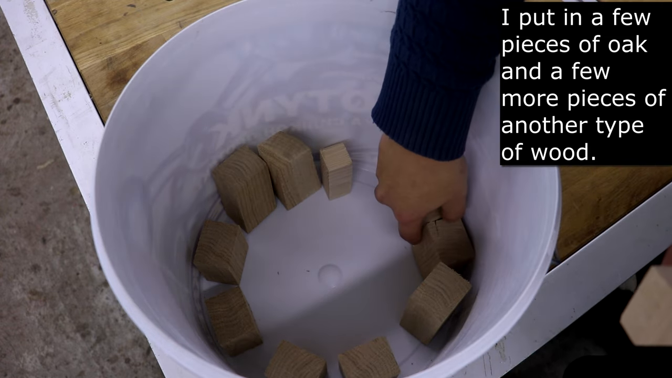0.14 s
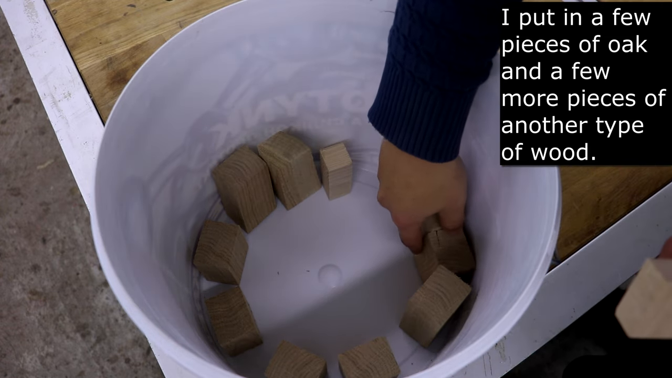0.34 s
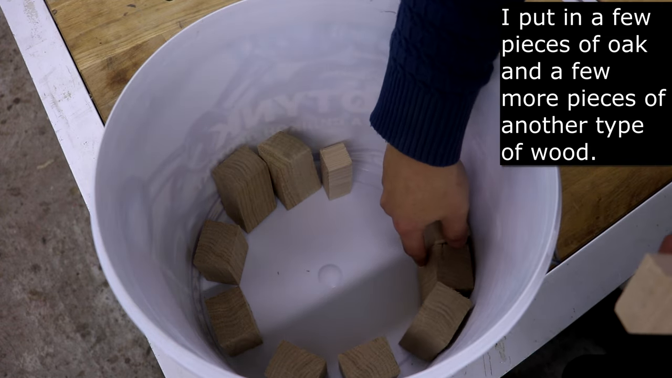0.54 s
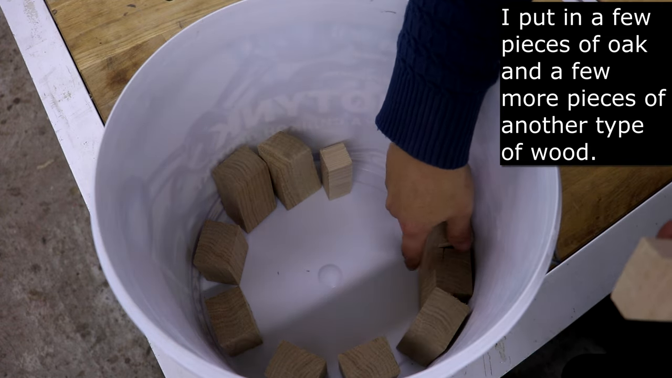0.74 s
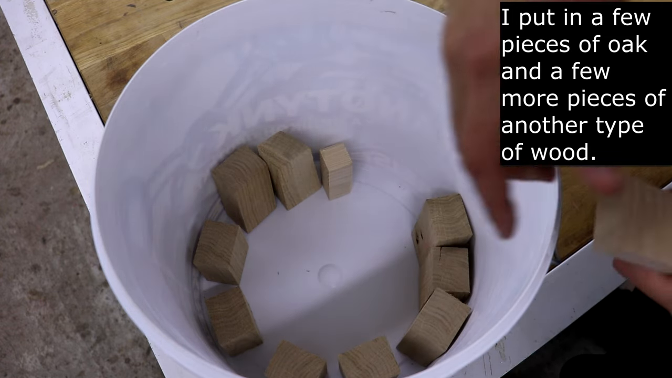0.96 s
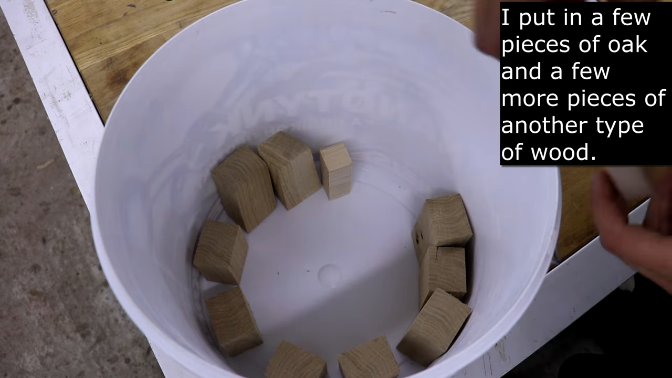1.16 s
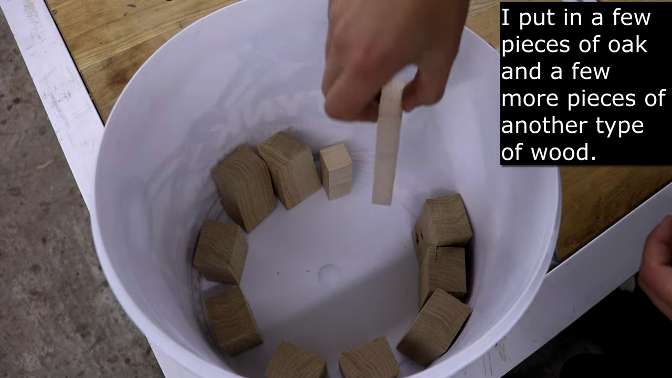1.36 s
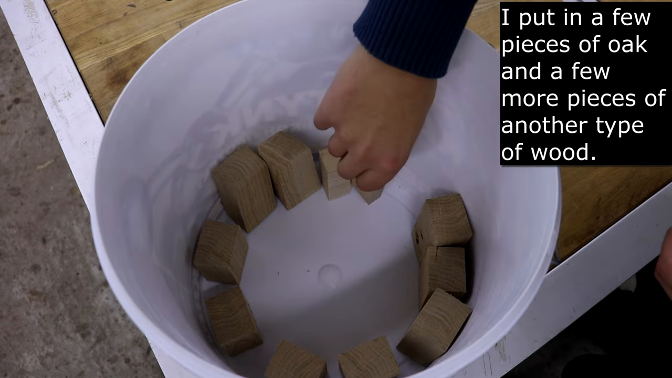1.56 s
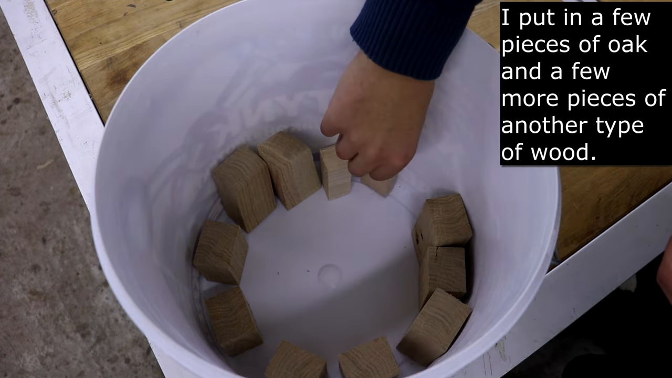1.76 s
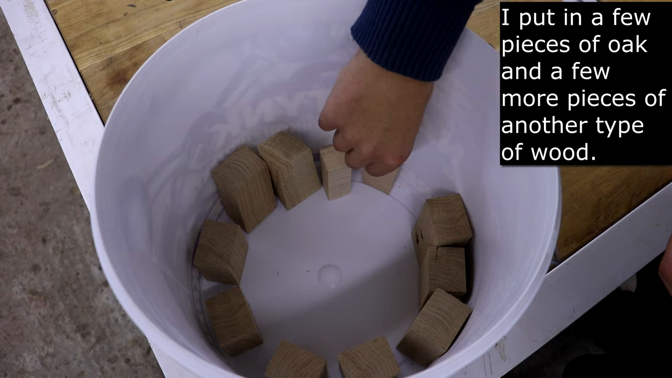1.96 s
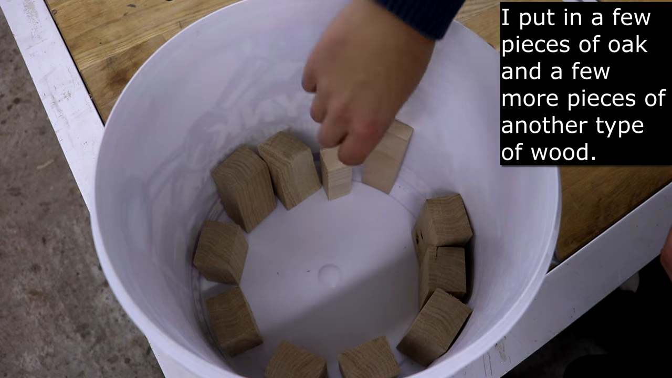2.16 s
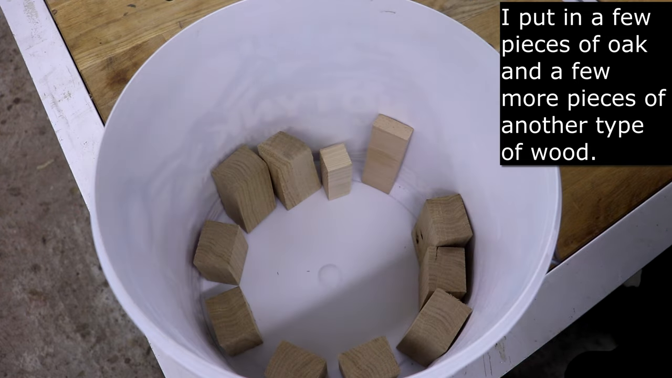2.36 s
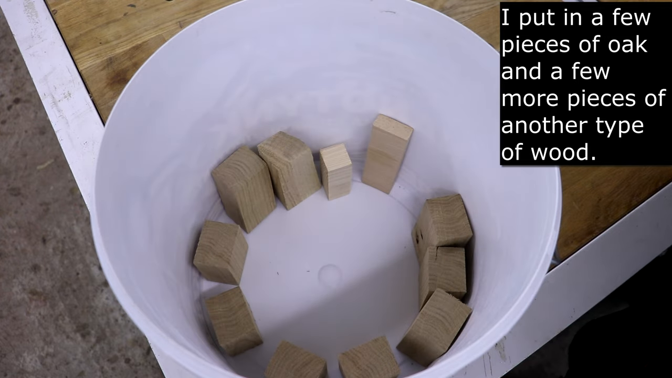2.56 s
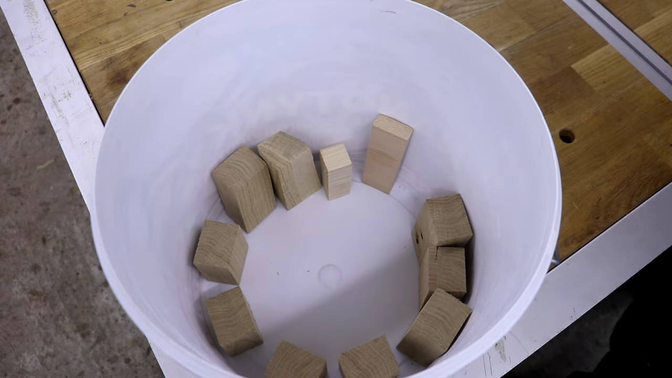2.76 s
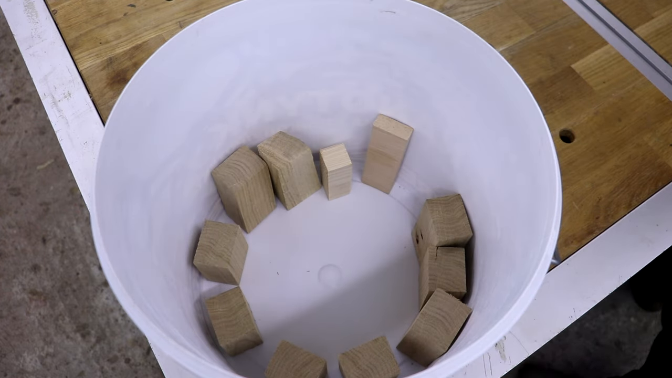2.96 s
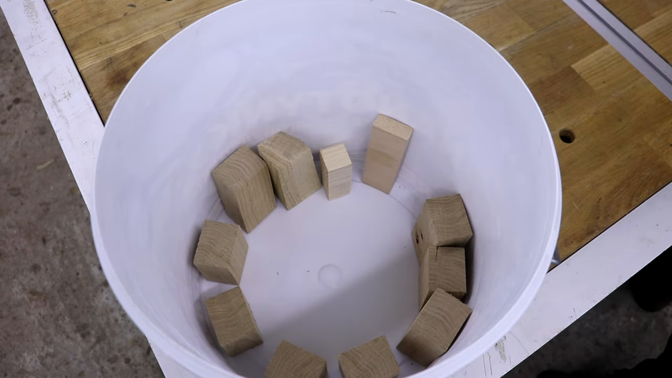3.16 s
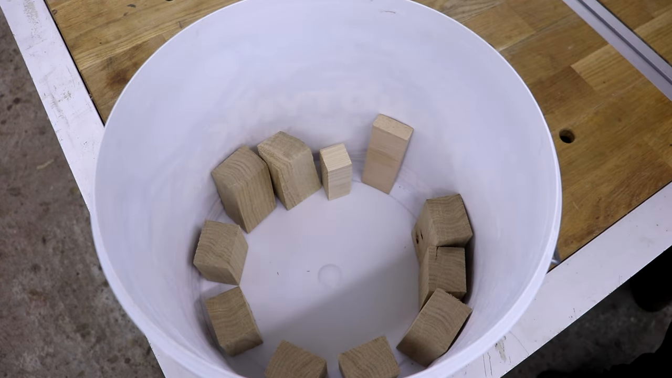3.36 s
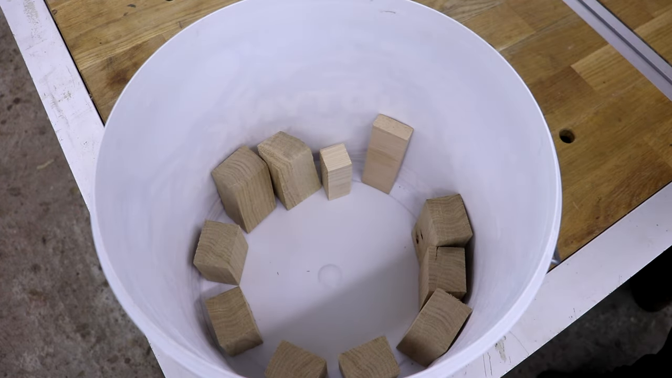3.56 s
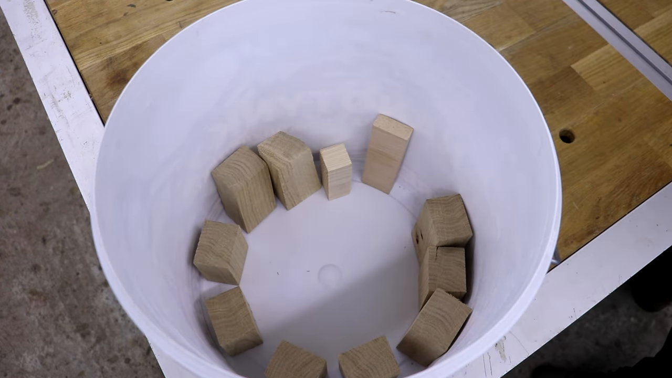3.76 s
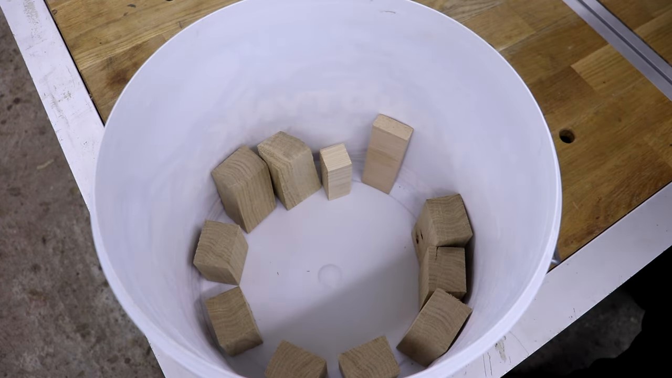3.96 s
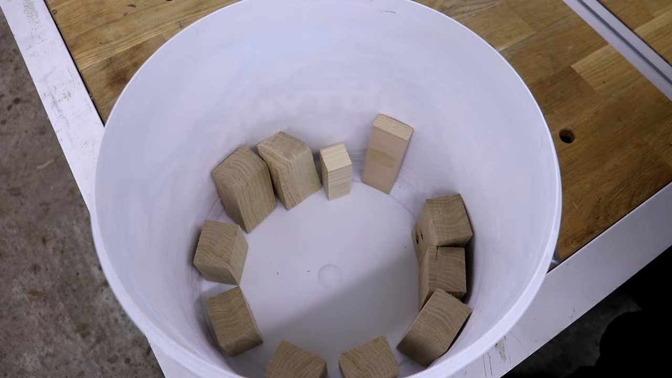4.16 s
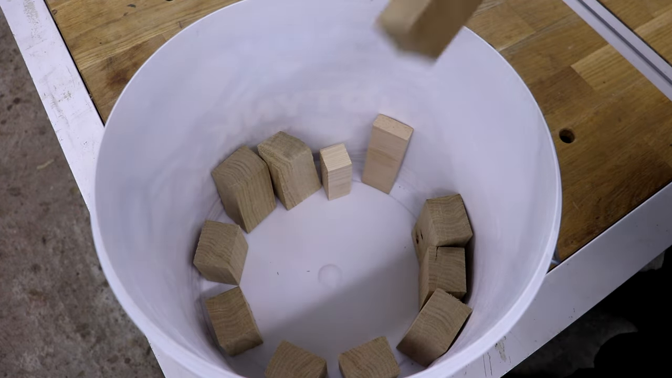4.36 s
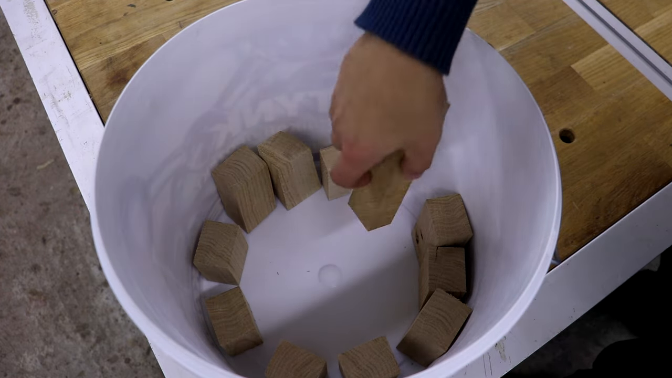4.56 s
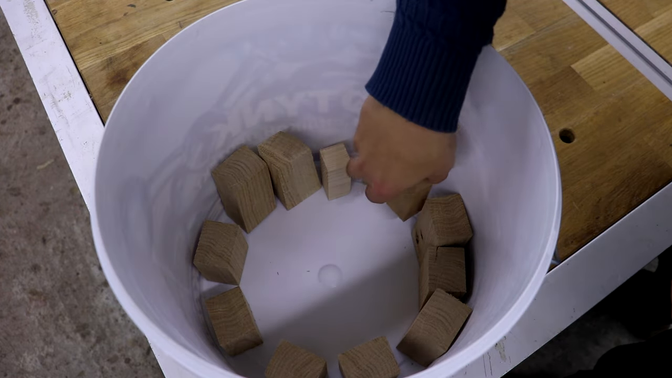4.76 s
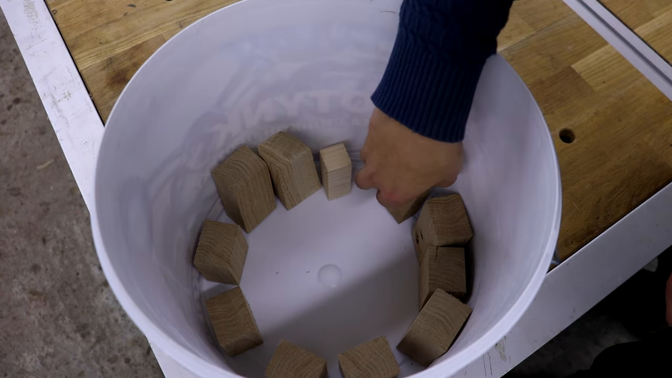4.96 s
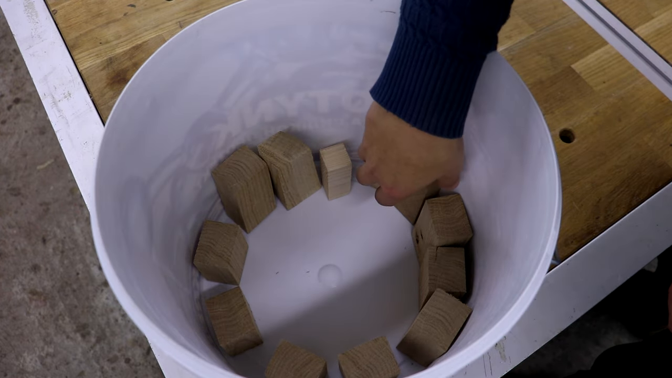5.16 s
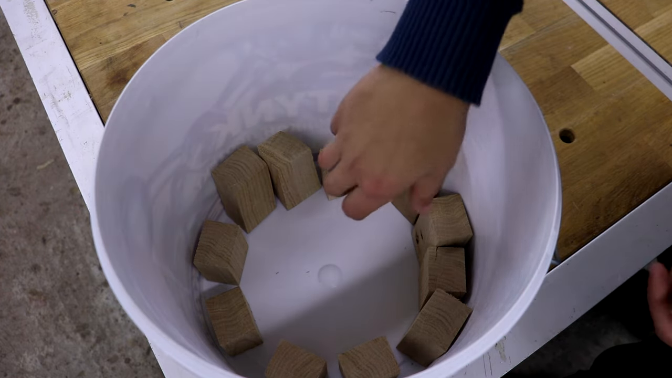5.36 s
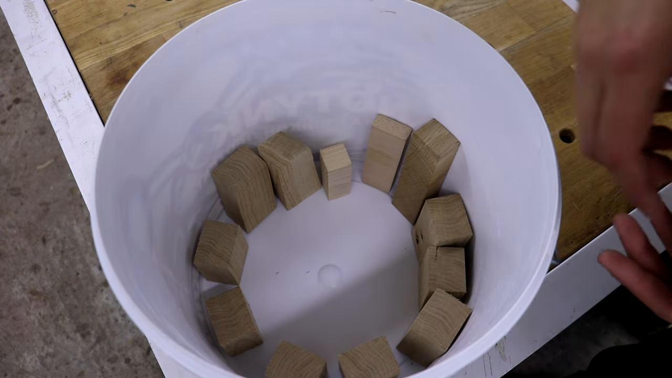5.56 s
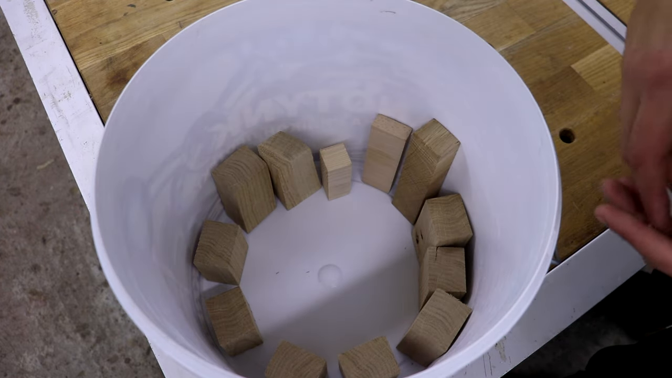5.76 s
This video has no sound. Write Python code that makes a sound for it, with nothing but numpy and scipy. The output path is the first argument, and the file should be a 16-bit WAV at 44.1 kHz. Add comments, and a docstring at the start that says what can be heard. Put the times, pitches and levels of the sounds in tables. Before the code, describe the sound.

Small wooden blocks scrape and clack as they are set into a plastic bucket, with hollow knocks over a faint machine hum.

```python
"""Wooden blocks in a plastic bucket

A hand slides small wooden blocks around a bucket on a workbench and drops two more in.
Each blow cracks in the block, rattles the wall and booms in the base. A sleeve swishes,
a machine hums and dull knocks come from elsewhere in the workshop. The close microphone
overloads on the hardest blows, and its gain control lets the room swell up behind them."""
import sys
import numpy as np
from scipy import signal
from scipy.fft import rfft, irfft, next_fast_len
from scipy.io import wavfile
from scipy.ndimage import uniform_filter1d

SR = 44100
rng = np.random.default_rng(int(sys.argv[2]) if len(sys.argv) > 2 else 0)


def store_pcm(level_fs):
    """Save levels as 16-bit WAV."""
    pcm = np.round(np.clip(level_fs, -1, 1) * 32767).astype(np.int16)
    wavfile.write(sys.argv[1], SR, np.atleast_2d(pcm).T)


N = 256220
T = np.arange(N) / SR
RING_T = T[:SR // 4]  # the quarter second that one blow lasts


def amp(db):
    """Turns decibels into a gain."""
    return 10 ** (np.asarray(db) / 20)


def unit(x):
    """Scales a sound to an average (rms) level of one."""
    return x / np.sqrt(np.mean(x ** 2) + 1e-20)


def curve_at(points, hz):
    """Looks up values between a table's rows, on a log-frequency axis."""
    freqs, values = np.transpose(points)
    return np.interp(np.log(hz + 1), np.log(freqs + 1), values)


def add(mix, start, sound):
    """Mixes a sound in at a start time in seconds."""
    part = mix[max(round(start * SR), 0):][:len(sound)]
    part += sound[:len(part)]


def cut(x, order, hz, kind):
    """Keeps the lows or the highs; a higher order cuts more steeply."""
    return signal.sosfilt(signal.butter(order, hz, kind, fs=SR, output="sos"), x)


def contact(hz, hard_hz):
    """A soft contact lasts longer, so it barely stirs frequencies above hard_hz."""
    return 1 / np.sqrt(1 + (hz / hard_hz) ** 3)


def colour(x, spectrum, hard_hz=np.inf):
    """Shapes a sound's lows and highs, then scales it to a level of one."""
    size = next_fast_len(len(x))
    hz = np.fft.rfftfreq(size, 1 / SR)
    shaped = rfft(x, size) * amp(curve_at(spectrum, hz)) * contact(hz, hard_hz)
    return unit(irfft(shaped, size)[:len(x)])


def mode(hz, t60):
    """One ringing tone that fades by 60 dB in t60 seconds."""
    return amp(-60 * RING_T / t60) * np.sin(2 * np.pi * hz * RING_T)


def dying(t60, rise):
    """A loudness curve that rises quickly and dies away; both times are in seconds."""
    return np.exp(-np.log(1000) * RING_T / t60) * (1 - np.exp(-RING_T / rise))


def resonate(x, hz, width):
    """Makes a sound ring in a band around hz; the width is in Hz too."""
    turn = np.exp(2j * np.pi * np.cumsum(hz * np.ones(len(x))) / SR)
    decay = np.exp(-np.pi * width / SR)
    return unit((turn * signal.lfilter([1 - decay], [1, -decay], x / turn)).real)


def slips(per_s, spread_db):
    """Many tiny clicks of uneven size, like the slips of friction."""
    size = amp(spread_db * np.minimum(rng.exponential(1, N), 4))
    return rng.standard_normal(N) * size * (rng.random(N) < per_s / SR)


def stroke(start, rise, fall):
    """The loudness of one hand movement: it speeds up smoothly, then slows to rest."""
    ramp = np.interp(T, [start, start + rise, start + rise + fall], [0, 1, 0])
    return np.sin(np.pi / 2 * ramp) ** 1.84  # a higher power gives a sharper peak


def background():
    """Faint hiss and a slightly wavering machine hum."""
    # Each row: a machine tone's pitch in Hz, level in dB.
    hum_tones = [(73.3, -63.5), (367, -90.5), (585, -77.5), (1318, -80.5)]
    # Each row: frequency in Hz, the hiss's relative level in dB.
    air_spectrum = [(20, -8.5), (60, 4.5), (200, 3), (550, 3), (700, -3), (1400, -3.5), (2100, -7),
                    (5000, -10), (9000, -13.5), (15500, -15.5)]
    waver = unit(uniform_filter1d(rng.standard_normal(N), SR // 4))
    wavering_t = T + 0.004 * np.cumsum(waver) / SR
    hum = sum(amp(db) * np.sqrt(2) * np.sin(2 * np.pi * hz * wavering_t) for hz, db in hum_tones)
    return hum + amp(-63) * colour(rng.standard_normal(N), air_spectrum)


def room(x, build_up):
    """The workshop's many scattered echoes, each frequency dying at its own speed."""
    # Each row: frequency in Hz, seconds for the echoes to fade by 60 dB.
    fade_times = [(100, 0.45), (350, 0.29), (1200, 0.57), (3000, 0.54), (6000, 0.41), (10000, 0.27),
                  (16000, 0.16)]
    # Each row: frequency in Hz, the echoes' relative level in dB.
    echo_spectrum = [(60, -15.5), (200, 5.5), (400, 4), (700, 8.5), (1500, -5), (4000, -7), (8000, -2),
                     (16000, -9.5)]
    echoes = rng.choice([-1., 1.], SR) * (rng.random(SR) < 4000 / SR)
    hz, t, bands = signal.stft(echoes, SR, nperseg=256)
    bands *= np.exp(-np.log(1000) * t / curve_at(fade_times, hz)[:, None])
    bands *= amp(curve_at(echo_spectrum, hz))[:, None]
    tail = signal.istft(bands, SR, nperseg=256)[1][:SR] * (1 - np.exp(-T[:SR] / build_up))
    return signal.oaconvolve(x, tail / np.linalg.norm(tail))[:N]


def knocks():
    """Muffled blows on something heavy: a thud, a hollow tok and two low tones, with no deep bass."""
    # Each row: start in seconds, level in dB, hardness (where the treble is cut) in Hz, boom in dB.
    far_hits = [(2.741, -49, 1030, -52), (3.095, -42, 1366, -52.5), (3.168, -44.5, 1520, -64),
                (3.686, -42, 1880, -32.5), (3.698, -34, 2180, -33.5), (3.715, -32.5, 2380, -37),
                (3.727, -59, 1660, -34), (4.1114, -41.5, 1460, -56), (4.152, -51, 1510, -47.5)]
    # Each row: frequency in Hz, the thud's relative level in dB.
    thud_spectrum = [(40, -29.5), (105, -44), (170, -17), (380, 8.5), (600, 1.5), (800, -0.5), (1350, 9.5),
                     (2100, 2.5), (3000, 4), (5000, 3), (14000, -10)]
    out = np.zeros(N)
    boom = mode(hz=180.6, t60=0.11) + amp(-8.5) * mode(hz=375, t60=0.14)
    boom *= 1 - np.exp(-RING_T / 0.002)
    tok = mode(hz=1065, t60=0.011)
    for start, db, hard_hz, boom_db in far_hits:
        thud = colour(rng.standard_normal(len(RING_T)), thud_spectrum) * dying(t60=0.081, rise=0.00069)
        # a padded contact cuts the treble steeply; only a little scuff remains above it
        muffled = cut(thud, 4, hard_hz, "lowpass")
        knock = amp(5) * muffled + amp(-17.5) * thud + amp(3.5) * tok
        add(out, start, amp(db) * knock + amp(boom_db) * boom)
    return cut(out, 4, 125, "highpass")


def sleeve():
    """Cloth brushes past with a soft swish as the arm moves."""
    # Each row: start, time speeding up and time slowing down in seconds, level in dB.
    brushes = [(2.73, 0.092, .22, -63), (4.269, 0.14, 0.28, -55), (4.68, 0.037, 0.19, -61.5)]
    # Each row: frequency in Hz, the swish's relative level in dB.
    cloth_spectrum = [(200, -6.5), (600, -3), (1300, 5.5), (2800, -0.5), (5000, -5.5), (11000, -13),
                      (16000, -26.5)]
    level = sum(amp(db) * stroke(start, rise, fall) for start, rise, fall, db in brushes)
    return level * colour(slips(per_s=8700, spread_db=0.5), cloth_spectrum)


def high_hisses():
    """Light rubs wake a held block's high tones; the last sound is just a faint high hiss."""
    # Each row: start in seconds, length in seconds, level in dB.
    # The last row is the hiss just before the loudest blow.
    hisses = [(1.083, 0.037, -59), (1.146, 0.054, -56), (1.495, 0.012, -61), (1.612, 0.067, -60),
              (1.804, 0.087, -53), (2.498, .016, -64), (3.444, 0.015, -63), (4.605, 0.06, -65.5),
              (4.859, .07, -59.5)]
    # Each row: a tone's pitch in Hz, half its filter's width in Hz, relative level in dB.
    high_tones = [(5260, 1100, 0.5), (5700, 220, -8.5), (7900, 330, -3.5), (10050, 330, -5.5)]
    attack_s, release_s = 0.0027, 0.008
    grain = slips(per_s=20000, spread_db=3)
    level = np.zeros(N)
    for start, length, db in hisses:
        fade_in = np.clip((T - start) / attack_s, 0, 1)
        fade_out = np.clip(1 - (T - start - length) / release_s, 0, 1)
        level += amp(db) * fade_in * fade_out
    hiss = sum(amp(db) * resonate(resonate(grain, hz, 2 * half_width), hz, 2 * half_width)
               for hz, half_width, db in high_tones)
    return level * unit(hiss)


def sliding():
    """A pushed block's tiny slips hiss in the plastic, chatter in the wood and stir the base."""
    # Each row: start, time speeding up and time slowing down in seconds,
    # friction level in dB, chatter level in dB, chatter pitch in Hz.
    pushes = [(0, 0.1, 0.048, -33, -36.5, 2080), (.021, .008, .014, -49, -37.5, 1940),
              (.041, 0.0065, 0.0083, -61, -27.5, 2180), (.155, 0.045, 0.067, -40, -53, 3520),
              (0.237, 0.08, 0.029, -37, -51.5, 3600), (0.384, 0.089, 0.17, -36.5, -46.5, 1830),
              (0.572, 0.052, 0.088, -37, -47.5, 1550), (.805, 0.026, 0.031, -47, -47, 1940)]
    # Each row: frequency in Hz, the hiss's relative level in dB.
    hiss_spectrum = [(60, -14), (200, -1.5), (420, -1.5), (700, -11), (1080, 3), (1700, -1.5), (2800, -1.5),
                     (4600, 0), (6500, -9.5), (9000, -13), (12000, -21.5), (16000, -26)]
    grip = unit(uniform_filter1d(rng.standard_normal(N), size=250))  # the block catches and lets go
    grain = slips(per_s=9000, spread_db=1.2) * amp(1.77 * grip)
    base = resonate(resonate(grain, hz=393, width=200), hz=396, width=270)
    friction = colour(grain, hiss_spectrum) + amp(-11) * base
    out = np.zeros(N)
    for start, rise, fall, friction_db, chatter_db, chatter_hz in pushes:
        chatter = resonate(resonate(grain, chatter_hz, width=860), chatter_hz, width=680)
        out += stroke(start, rise, fall) * (amp(friction_db) * friction + amp(chatter_db) * chatter)
    return out


def bucket():
    """The bucket rings low in its body and high in its wall; each wall tone is kept separate."""
    # Each row: pitch in Hz, level in dB, seconds to fade by 60 dB.
    bucket_tones = [(112, -17.5, 0.15), (137.6, -5, 0.059), (180, -6, 0.14), (230.5, -3, .16),
                    (296.3, -5, 0.054), (367, -10, 0.2), (537, -11.5, 0.21), (761, -12, .07),
                    (1089, 5.5, 0.038), (1290, 0, .07), (1397, -4.5, 0.095), (1505, 5, .08),
                    (1623, 4, 0.049), (1848, -12.5, 0.07), (1920, 4.5, 0.094), (2214, -30, 0.034),
                    (2510, 5, 0.038), (2900, -8, 0.17), (3620, -11, 0.051), (4880, -3.5, 0.037)]
    body_top_hz = 650
    body = sum((-1) ** k * amp(db) * mode(hz, t60)
               for k, (hz, db, t60) in enumerate(bucket_tones) if hz < body_top_hz)
    wall_hz = np.array([hz for hz, _, _ in bucket_tones if hz >= body_top_hz])
    wall_tones = np.array([amp(db) * mode(hz, t60) for hz, db, t60 in bucket_tones if hz >= body_top_hz])
    return body, wall_hz, wall_tones


def block(pitch_hz):
    """The brief ring of a small piece of hardwood: the higher it is, the sooner it dies."""
    # Each row: multiple of the block's pitch, level in dB, cycles to fade by 60 dB.
    wood_tones = [(0.999, 0.5, 20.4), (1.901, -8, 38)]
    return sum(amp(db) * mode(pitch_hz * multiple, t60=cycles / (pitch_hz * multiple))
               for multiple, db, cycles in wood_tones)


def blows(crack_t60, directions):
    """Blocks strike the bucket. Gives one sound per direction, each with its own crack and rattle."""
    # A block falls, bounces or hits another, and rings. Each row: start in seconds, crack in dB,
    # hardness in Hz, block ring in dB, block pitch in Hz, base boom in dB, base pitch in Hz, body in dB.
    clacks = [(.136, -20.5, 3000, -20, 3620, -19, 366, -34.5),
              (.172, -24, 3980, -36, 3830, -26.5, 425, -30.5), (.311, -29, 8040, -28, 3690, -40, 404, -56),
              (.858, -33.5, 7000, -47, 5400, -40, 364, -53),
              (0.866, -26.5, 8000, -29, 2790, -45, 360, -32.5),
              (1.142, -47.5, 9200, -38.5, 5700, -49, 424, -56.5),
              (1.6202, -32.5, 1200, -31.5, 1070, -25.5, 439, -37),
              (1.7948, -20, 1403, -23, 1000, -23, 346, -44),
              (1.8446, -9.5, 3980, -7.5, 2420, -10.5, 428, -22),
              (1.8508, -21.5, 7130, -26, 5300, -29.5, 450, -37),
              (1.891, -22.5, 3500, -10.5, 1425, -39, 500, -41),
              (1.9156, -1.5, 4600, 1.5, 1502, -6, 370, -46), (1.924, -7, 3000, -4, 1520, -30, 416, -42),
              (1.9698, -23, 2000, -13.5, 1180, -13, 355, -31.5),
              (4.9193, 0.5, 4550, 4.5, 2030, 1, 393.4, -4), (4.9223, 1, 9200, 4, 5140, -9.5, 218, -11),
              (4.9301, -18, 2970, -3, 2030, -1.5, 335, -42),
              (4.9489, -6.5, 3500, -8, 2350, -22.5, 434, -24.5),
              (5.1097, -17.5, 6840, -14, 2250, -15, 449, -24),
              (5.14, -22.5, 2800, -25.5, 2230, -38, 400, -27)]
    # A held or settling block leans into the base without ringing.
    # Each row: start in seconds, force in dB, hardness in Hz, base pitch in Hz, body in dB.
    bumps = [(.004, -21.5, 1500, 443, -33.5), (0.092, -13, 3000, 397, -31), (0.125, -27, 1200, 390, -36),
             (.143, -7, 1200, 365, -32), (.183, -14.5, 2200, 413, -31), (0.265, -25, 2500, 273, -40.5),
             (.317, -21, 2500, 390, -34), (0.6301, -16.5, 3000, 411, -50), (.662, -21, 2500, 348, -31),
             (0.783, -31, 450, 295, -38.5), (0.8315, -26.5, 3500, 452, -27), (.845, -21, 3030, 403, -61),
             (0.877, -19, 500, 357, -35), (0.915, -31, 2500, 392, -53), (1.937, -4.5, 2500, 404, -55.5),
             (2.07, -22.5, 2000, 335, -47.5), (2.082, -25.5, 1000, 394, -41), (5.159, -22, 2500, 354, -47),
             (5.166, -14.5, 450, 356, -39), (5.2, -21.5, 500, 413, -34.5), (5.22, -32.5, 2000, 430, -45)]
    # Wood on plastic shakes briefly at many frequencies. Each row: frequency in Hz, relative level in dB.
    crack_spectrum = [(30, -38), (150, -9.5), (450, 8), (680, -12), (1100, 3.5), (2000, -4), (3200, -1),
                      (5200, -5.5), (7000, -12.5), (11000, -32), (16000, -35)]
    bump_crack_db, wall_db, thump_db, thump_hz = -12, -20, 10, 259
    body, wall_hz, wall_tones = bucket()
    burst = dying(crack_t60, rise=0.0001) / np.sqrt(crack_t60 / 0.022)  # same energy at any length
    hits = [(start, db, hard_hz, amp(ring_db) * block(ring_hz), boom_db, boom_hz, body_db)
            for start, db, hard_hz, ring_db, ring_hz, boom_db, boom_hz, body_db in clacks]
    hits += [(start, force_db + bump_crack_db, hard_hz, 0, force_db, boom_hz, body_db)
             for start, force_db, hard_hz, boom_hz, body_db in bumps]
    out = np.zeros((directions, N))
    for start, crack_db, hard_hz, ring, boom_db, boom_hz, body_db in hits:
        # the blocks' weight tunes the thin base, which takes a moment to get going
        boom = np.sin(2 * np.pi * boom_hz * RING_T) * dying(t60=0.059, rise=0.002)
        tones = ring + amp(boom_db) * boom + amp(body_db) * body
        for direction in out:
            impact = colour(rng.standard_normal(len(RING_T)), crack_spectrum, hard_hz) * burst
            wall = (rng.choice([-1, 1], len(wall_hz)) * contact(wall_hz, hard_hz)) @ wall_tones
            # the low part of the impact is the whole bucket's thump
            thump = amp(body_db + thump_db) * cut(impact, 3, thump_hz, "lowpass")
            crack = cut(impact, 3, thump_hz, "highpass")
            add(direction, start, amp(crack_db) * (crack + amp(wall_db) * wall) + thump + tones)
    return out


def scene():
    """The bucket is close, with little echo; the knocks are farther off and carry more of the room."""
    direct = blows(crack_t60=0.02, directions=1)[0]
    scattered = blows(crack_t60=0.036, directions=3)  # longer from bouncing around inside the bucket
    friction = sliding() + sleeve()
    far = knocks()
    echoes = amp(-18.5) * sum(room(way, build_up=0.0023) for way in scattered)
    echoes += amp(-12) * room(friction, build_up=0.01) + amp(-1.5) * room(far, build_up=0.00088)
    return (direct + friction + high_hisses() + amp(1.5) * far + echoes + background())[None]


def gain_control(x, threshold_db, recover_db_per_s, attack_s, share):
    """Turns the gain down by a share of the excess just after a loud peak, then lets it creep back."""
    peak_db = 20 * np.log10(abs(x).max(0) + 1e-9)
    over_db = share * np.maximum(peak_db - threshold_db, 0)
    recovery_db = T * recover_db_per_s
    held_db = np.maximum.accumulate(over_db + recovery_db) - recovery_db
    lag = np.exp(-1 / (attack_s * SR))
    return x * amp(-signal.lfilter([1 - lag], [1, -lag], held_db))


def record(dry):
    """The microphone turns loud blows down, clips what is still too loud and loses the top treble."""
    ceiling, top_hz = amp(-8.4), 15950
    levelled = gain_control(dry, threshold_db=-12.5, recover_db_per_s=137.5, attack_s=0.0046, share=0.75)
    clipped = np.clip(levelled, -ceiling, ceiling)
    treble_cut = signal.firwin(401, top_hz, window=("kaiser", 8), fs=SR)
    return signal.oaconvolve(clipped, treble_cut[None], "same")


dry = scene()
out = record(dry)
store_pcm(out)
```